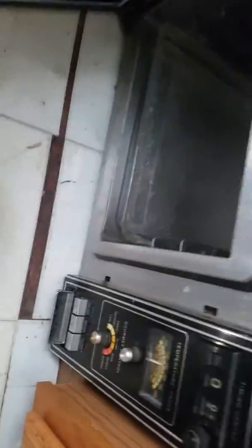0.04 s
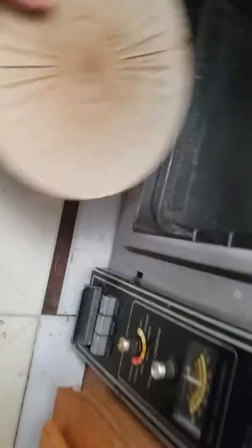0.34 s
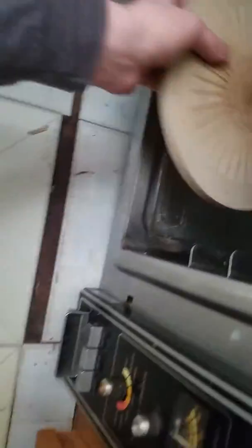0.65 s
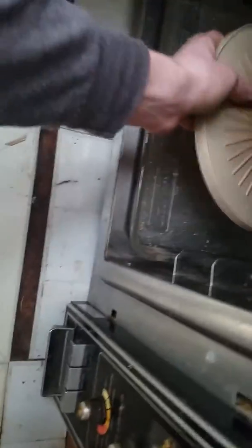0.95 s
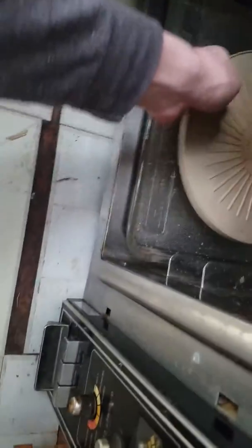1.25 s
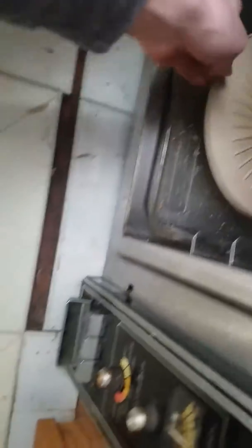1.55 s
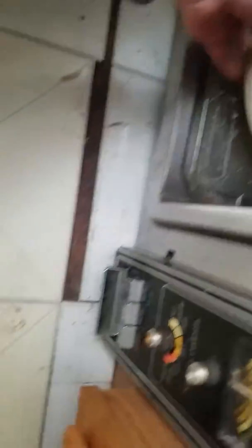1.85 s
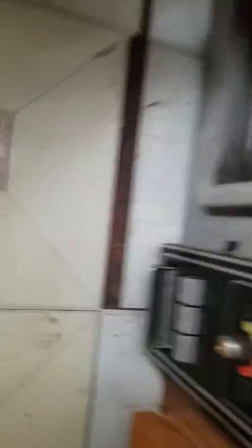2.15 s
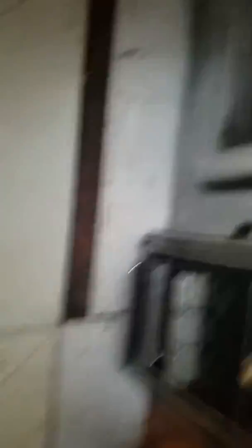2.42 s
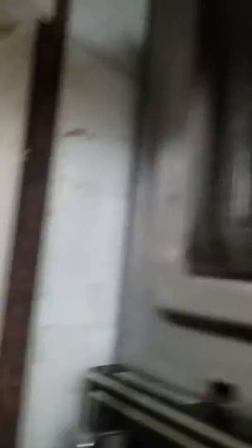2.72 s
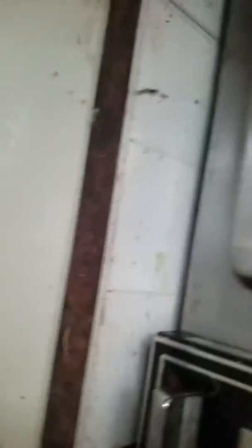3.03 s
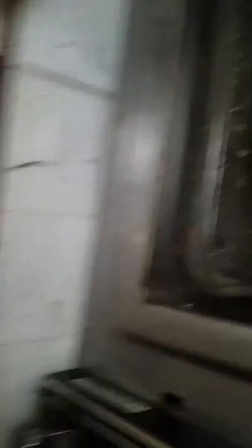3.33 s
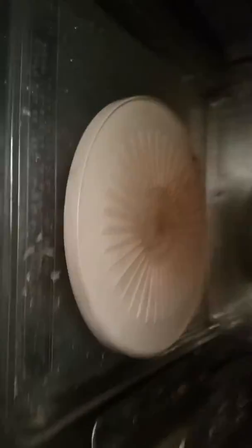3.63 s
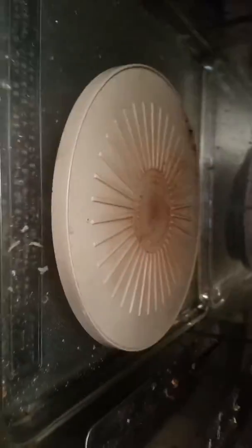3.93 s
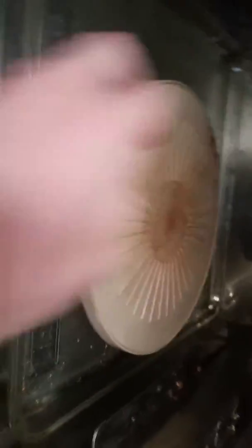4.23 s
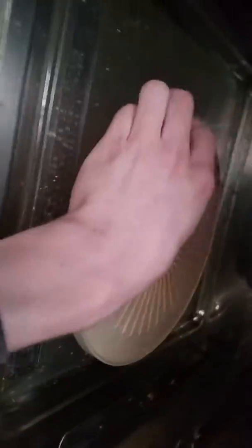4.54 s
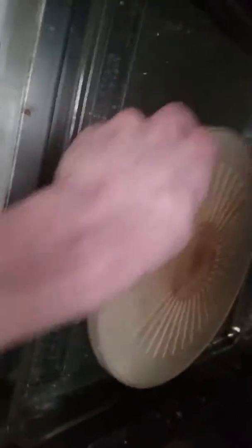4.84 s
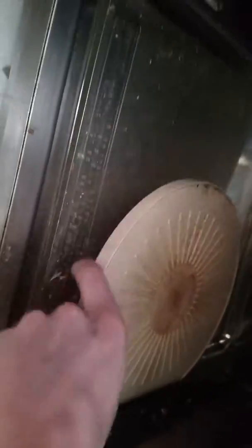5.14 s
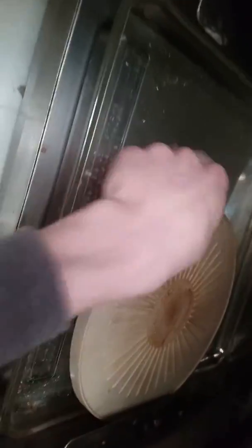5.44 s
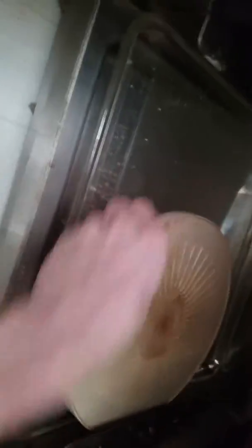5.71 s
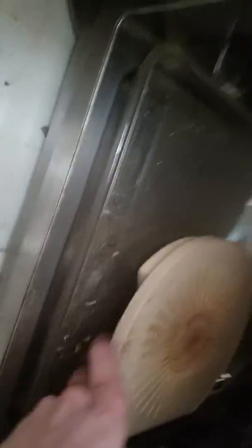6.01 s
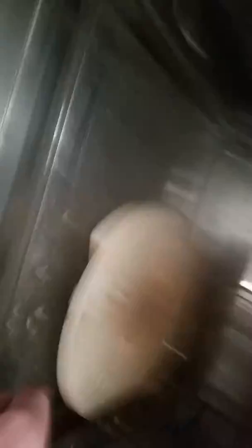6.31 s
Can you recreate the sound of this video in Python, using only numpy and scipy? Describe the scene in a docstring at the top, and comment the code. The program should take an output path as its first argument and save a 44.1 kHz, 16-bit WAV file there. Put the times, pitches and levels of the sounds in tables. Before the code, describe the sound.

A faint appliance hum and quiet kitchen air run throughout, heard through a close hand-held stereo microphone. A step thuds at 0.2 seconds. At about 0.8 seconds a ceramic plate knocks against a steel microwave oven, then clatters, rocks and scrapes until 1.5 seconds, each contact ringing in the metal box. Light ticks follow, with another scrape and clink near 2.3 seconds. Low footsteps thud around 2.6 seconds, the heaviest, and again near 3.7, amid soft sleeve rustle and handling rumble. From 4.4 seconds fingers pat the plastic cover and the plate slides in short pushes. It drops and rocks at 5 seconds, and the oven floor booms hollowly. A louder scrape builds from 5.5 seconds, with a brief squeak at 5.7 and a sharp rattling clack at 5.8, leaving a low boom fading away.

```python
"""In a kitchen, a ceramic plate under a plastic cover is set into an old steel microwave oven.
The plate knocks, drops and rocks to rest, then scrapes and squeaks as it is nudged into place.
Each contact rings the plate and rattles round the steel box; the oven floor booms when the hand
lets go. Steps thud, a sleeve rustles near the hand-held stereo microphone, and an appliance hums."""
import sys
import numpy as np
from scipy import signal
from scipy.fft import rfft, irfft, next_fast_len
from scipy.io import wavfile
from scipy.ndimage import uniform_filter1d

SR = 44100
rng = np.random.default_rng(int(sys.argv[2]) if len(sys.argv) > 2 else 0)


def unload_audio(sound):
    """Save the sound as a 16-bit wav file, at the path given as the first command line argument."""
    columns = np.transpose(np.atleast_2d(sound))
    # keep every value between -1 and 1, then stretch to whole-number steps
    steps = np.round(np.clip(columns, -1, 1) * 32767)
    wavfile.write(sys.argv[1], SR, steps.astype(np.int16))


N = 285327
T = np.arange(N) / SR
RING_T = T[:SR * 9 // 20]  # the life of one blow

# the notes that plate and oven ring with: pitch_hz, level_db, fade_s (a fade is the time to fall 60 dB)
RING_NOTES = [(100, -2, .35), (153, -6, .3), (360, -5, .33), (497, -5, .33), (555, -6, .3), (598, -2, .35),
              (630, -4, .38), (705, -6, .25), (802, -6, .42), (845, -7, .38), (932, -4, .36),
              (980, -6, .33), (1134, -7, .18), (1203, -5, .2), (1278, -2, .25), (1335, -6, .24),
              (1470, -5, .22), (1503, -3, .28), (1605, -5, .2), (1680, -4, .26), (1906, -8, .25),
              (2366, -4, .21), (2500, -7, .2), (2620, -8, .18), (2668, -5, .24), (2732, -6, .24),
              (2880, -9, .2), (3595, -13, .3), (4815, -16, .24)]
# borders of six bands, from low thump to high treble: edge_hz
BAND_EDGES = [55, 220, 800, 1800, 3400, 7000, 16000]
# how alike left and right sound: pitch_hz, likeness (1 = the same)
LIKENESS = [(60, 0.99), (170, .99), (300, 0.94), (650, 0.41), (1300, 0.18), (3000, 0.066), (16000, .05)]


def amp(db):
    """Turns decibels into a gain."""
    return 10 ** (np.asarray(db) / 20)


def unit(x):
    """Scales a sound to an average (rms) strength of 1."""
    return x / np.sqrt(np.mean(x ** 2) + 1e-20)


def attack_strength(x):
    """Strength of the first 25 ms of a blow."""
    return np.sqrt(np.mean(x[:, :SR // 40] ** 2) + 1e-20)


def look_up(table, hz):
    """Reads a table between its rows, on a scale of octaves."""
    pitches, values = np.transpose(table)
    return np.interp(np.log(hz + 1), np.log(pitches + 1), values)


def gain_over_time(curve):
    """Turns rows of time and decibels into a gain for every sample."""
    return amp(np.interp(T, *np.transpose(curve)))


def add(mix, start_s, sound):
    """Mixes a sound in at its start time."""
    part = mix[:, round(start_s * SR):][:, :sound.shape[-1]]
    part += sound[..., :part.shape[1]]


def stereo(spectra, hz, right_delay_s=0.00021):
    """Blends two unrelated spectra into left and right; the left microphone is nearer."""
    alike = np.clip(look_up(LIKENESS, hz), -1, 1)
    mid = np.sqrt((1 + alike) / 2) * spectra[0]
    side = np.sqrt((1 - alike) / 2) * spectra[1]
    return np.array([mid + side, (mid - side) * np.exp(-2j * np.pi * hz * right_delay_s)])


def coloured(white, colour):
    """Gives two rows of white noise a tone colour and a stereo width, at strength 1."""
    size = next_fast_len(white.shape[1], True)
    hz = np.fft.rfftfreq(size, 1 / SR)
    spectra = stereo(rfft(white, size), hz) * amp(look_up(colour, hz))
    return unit(irfft(spectra, size)[:, :white.shape[1]])


def noise(colour, samples=N):
    """Steady stereo noise of the given colour."""
    return coloured(rng.standard_normal((2, samples)), colour)


def background(air_db=-53.5, waver_radians=.5):
    """Still kitchen air, the hum of an appliance, and the rumble of the hand on the microphone."""
    # colours of the air and of the hand's rumble: pitch_hz, level_db
    air_colour = [(20, -17), (45, -7.5), (120, -12), (300, -4.5), (470, -3.5), (650, -10), (1100, -14.5),
                  (2200, -20), (4000, -31), (7000, -39), (16000, -34.5)]
    grip_colour = [(20, -15), (40, -14.5), (62, 5.5), (110, -2), (160, 6), (260, -8.5), (500, -19),
                   (1200, -28), (4000, -52.5)]
    # how strongly the hand rumbles: time_s, level_db
    handling = [(0, -76), (.7, -59), (1.9, -57.5), (2.25, -34.5), (2.6, -36.5), (3.1, -44), (3.5, -45.5),
                (3.95, -43.5), (4.2, -46.5), (5.5, -39), (6.5, -48)]
    # the appliance's tones: pitch_hz, level_db
    hum_tones = [(118.4, -70), (236, -69), (355.3, -65), (473.7, -61), (3472, -84.5)]
    # the oven's walls screen off the kitchen as the microphone leans in: time_s, gain_db
    shelter = [(0, 3.5), (3.4, 4.5), (4.3, 1.5), (6.4, -8)]
    air = amp(air_db) * noise(air_colour)
    grip = gain_over_time(handling) * noise(grip_colour)
    hum, waver_times = np.zeros(N), np.linspace(0, T[-1], 50)
    for hz, db in hum_tones:
        waver = waver_radians * np.interp(T, waver_times, rng.standard_normal(len(waver_times)))
        hum += amp(db) * np.sqrt(2) * np.sin(2 * np.pi * hz * T + waver)
    return gain_over_time(shelter) * (air + hum) + grip


def sleeve(cloth_db=2, flutter_db=1.4):
    """Fibres brush past one another as the arm swings by the microphone."""
    # arm swings: fastest_s, half_length_s, level_db
    swings = [(2.126, 0.09, -55.5), (2.822, 0.38, -58.5), (3.445, .2, -55), (4.003, 0.12, -54.5)]
    # colour of the rustle: pitch_hz, level_db
    cloth_colour = [(30, -19), (170, 29.5), (300, -3), (700, 4), (2000, 14), (4000, 18), (7000, 11),
                    (10000, 12.5), (13500, 15.5), (16000, 14)]
    flutter = unit(uniform_filter1d(rng.standard_normal(N), size=700))
    power = sum(amp(db) ** 2 * np.exp(-((T - s) / half) ** 2) for s, half, db in swings)
    return amp(cloth_db + flutter_db * flutter) * np.sqrt(power) * noise(cloth_colour)


def steps(rise_s=0.0036, rumble_fade_s=0.28):
    """A heel bounces the kitchen floor at its own low note, and the cabinets rumble after it."""
    # footfalls: start_s, level_db, pitch_hz, fade_s, rumble_db (compared with the thud)
    footfalls = [(0.2264, -10.5, 99, 0.061, -16.5), (2.56, -1.5, 81.3, 0.14, -13),
                 (2.592, -6.5, 79.2, 0.22, -15), (2.808, -18, 84.6, 0.6, -3), (2.916, -37.5, 82, 0.14, 7),
                 (3.645, -21, 62, 0.15, -27), (3.762, -16, 88, 0.16, -38), (3.848, -30.5, 111, 0.13, -20)]
    # colour of the cabinets' rumble: pitch_hz, level_db
    cabinet_colour = [(25, -5), (45, -2.5), (75, -7.5), (150, -2.5), (280, -10.5), (500, -28),
                      (2000, -36.5), (6000, -56.5), (16000, -74)]
    out = np.zeros((2, N))
    rise = 1 - np.exp(-(RING_T / rise_s) ** 2)
    for start_s, db, hz, fade_s, rumble_db in footfalls:
        thud = -np.sin(2 * np.pi * hz * RING_T) * amp(-60 * RING_T / fade_s)
        rumble = amp(rumble_db - 60 * RING_T / rumble_fade_s) * noise(cabinet_colour, len(RING_T))
        add(out, start_s, amp(db) * rise * (thud + rumble))
    return out


def push(start_s, stop_s, db, rise_s=0.035, swell_db=18.5, fall_db_per_s=323):
    """Loudness of one push: rubbing grows as the hand leans in and dies when it stops."""
    rise = np.clip((T - start_s) / rise_s, 0, 1)
    to_go = np.clip((stop_s - T) / (stop_s - start_s), 0, 1)
    stopped_s = np.clip(T - stop_s, 0, 1)
    return rise * amp(db - swell_db * to_go - fall_db_per_s * stopped_s)


def sliding(slips_per_s=200, spread_db=0.0, slip_fade_s=0.11, tail_gain=0.22, ring_gain=0.26):
    """The plate's unglazed foot sticks and slips; each slip is a short burst that stirs its notes."""
    # pushes across the oven floor: start_s, stop_s, level_db (at the stop)
    pushes = [(1.02, 1.19, -23.5), (1.322, 1.398, -33), (1.45, 1.59, -47), (1.636, 1.89, -49.5),
              (2.095, 2.363, -37), (3.542, 3.588, -44), (4.38, 4.637, -47), (4.622, 4.798, -34.5),
              (4.804, 4.96, -29), (5.065, 5.274, -51.5), (5.38, 5.484, -46.5), (5.495, 5.887, -22.5)]
    # colour of the scrape: pitch_hz, level_db
    scrape_colour = [(30, -25.5), (70, -9.5), (170, 6.5), (300, 5), (700, -0.5), (1500, -4.5), (2800, -6.5),
                     (4500, -15.5), (7000, -22.5), (11000, -20), (16000, -25)]
    slipping = rng.random(N) < slips_per_s / SR
    slips = slipping * amp(spread_db * np.minimum(rng.exponential(1, N), 4))
    fading = amp(-120 * RING_T / slip_fade_s) + tail_gain * amp(-60 * RING_T / slip_fade_s)
    power = abs(signal.oaconvolve(slips ** 2, fading)[:N])
    scrape = coloured(np.sqrt(power) * rng.standard_normal((2, N)), scrape_colour)
    ring = sum(signal.lfilter(*signal.iirpeak(hz, hz * fade_s / np.pi, SR), scrape)
               for hz, _, fade_s in RING_NOTES)
    return sum(push(*row) for row in pushes) * unit(scrape + ring_gain * ring)


def squeak(peak_s=5.702, half_length_s=0.031, pitch_hz=2900, db=-34.5, jitter_hz=90, octave_db=-9):
    """Before the plate's foot breaks loose, its slips lock into an unsteady tone and its octave."""
    hz = pitch_hz + jitter_hz * unit(uniform_filter1d(rng.standard_normal((2, N)), size=90))
    phase = 2 * np.pi * np.cumsum(hz, axis=1) / SR
    swell = amp(db) * np.exp(-((T - peak_s) / half_length_s) ** 2)
    return swell * (np.sin(phase) + amp(octave_db) * np.sin(2 * phase))


def floor_boom(rise_s=0.0024, damping_s=.03, main_note_hz=194.5):
    """The oven's loaded steel floor booms on until the hand presses the plate again."""
    # booms: start_s, level_db, damped_at_s, hardness_db (extra per octave from a harder blow)
    booms = [(4.906, -19, 4.94, -2.5), (5.003, -17.5, 5.73, -1.5), (5.744, -21, 6.9, -1),
             (5.835, -25, 7, 4.2)]
    # the steel floor's own notes: pitch_hz, level_db, fade_s
    floor_notes = [(66, -13, 1.0), (88, -12, .7), (100, -4, .5), (153, -15, 1.0), (177, -10, 1.0),
                   (194.5, 0, 1.7), (269, -21, .8), (409, -23, .6), (490, -22, .7), (549, -19, 1.15),
                   (574, -22, 1.0), (748, -22, 1.45), (786, -18, 1.25), (937, -31, 1.1), (1034, -31, 1.0)]
    out = np.zeros((2, N))
    for start_s, boom_db, damped_at_s, hardness_db in booms:
        t = T[:N - round(start_s * SR)]
        rise = 1 - np.exp(-t / rise_s)
        damping = np.exp(-np.maximum(start_s + t - damped_at_s, 0) / damping_s)
        for hz, db, fade_s in floor_notes:
            stereo_phase = np.arccos(np.clip(look_up(LIKENESS, hz), -1, 1)) * np.array([[.5], [-.5]])
            tone = np.sin(2 * np.pi * hz * t + stereo_phase)
            strength_db = boom_db + db + hardness_db * np.log2(hz / main_note_hz)
            add(out, start_s, amp(strength_db - 60 * t / fade_s) * rise * damping * tone)
    return out


def floor_flex(pat_db, pitch_hz=166.2, boost_db=17.5, fade_s=.22, rise_s=0.01):
    """The oven floor bends under a pat and gives one short hollow note."""
    rise = 1 - np.exp(-RING_T / rise_s)
    return amp(pat_db + boost_db - 60 * RING_T / fade_s) * rise * np.sin(2 * np.pi * pitch_hz * RING_T)


def oven_rattle(landing_s, kitchen_db=-17, crack=1.6):
    """A sharp crack on landing, fast dense echoes in the steel box, and the slower kitchen behind."""
    # colour of the steel box: pitch_hz, level_db
    box_colour = [(40, -23), (95, -10), (170, 5), (240, -4), (400, 1.5), (650, 4.5), (1050, 1), (1500, 4.5),
                  (2100, 3.5), (2700, 1), (4600, -8), (6200, -17), (10000, -18.5), (16000, -21.5)]
    # how long echoes last in the box and in the kitchen: pitch_hz, fade_s
    box_fades = [(100, 0.22), (400, 0.25), (1000, 0.13), (3000, .12), (7000, 0.15), (14000, 0.16)]
    kitchen_fades = [(100, 0.51), (300, 1), (700, 1), (1500, 0.29), (3000, 0.64), (7000, 0.55),
                     (14000, 0.2)]
    white = rng.standard_normal((2, len(RING_T)))
    white[0, int(landing_s * SR)] += crack
    hz, t, spectra = signal.stft(coloured(white, box_colour), SR, nperseg=256)
    box = amp(-60 * t / look_up(box_fades, hz)[:, None])
    kitchen = amp(kitchen_db - 60 * t / look_up(kitchen_fades, hz)[:, None])
    rattle = signal.istft(spectra * np.hypot(box, kitchen), SR)[1][:, :len(RING_T)]
    return rattle / attack_strength(rattle)


def plate_body():
    """What all contacts share: the free ring of each note, and filters that split the bands."""
    hz, db, fade_s = np.transpose(RING_NOTES)
    rings = amp(db)[:, None] * np.exp((2j * np.pi * hz - np.log(1000) / fade_s)[:, None] * RING_T)
    bands = [signal.butter(3, edges, "band", fs=SR, output="sos")
             for edges in zip(BAND_EDGES, BAND_EDGES[1:])]
    return hz, rings, bands


def contact(body, db, pitch_hz, hardness_db, thump_db, fade_s, landing_s, pitch_boost_db,
            graze_db=-12, ring_db=-2, scatter_db=3.5, resonance=0.69, boost_width_octaves=0.69):
    """Each contact rings a new mix of notes; hard ones are brighter, and weight thumps the floor."""
    # the five bands above the thump, for a contact of middling hardness: level_db
    touch_db = [0, -3.5, -7, -11, -13]
    hz, rings, bands = body
    phases = stereo(np.exp(2j * np.pi * rng.random((2, len(hz)))), hz)
    shares = phases * amp(scatter_db * rng.standard_normal(len(hz)))
    ring = (shares @ rings).real
    graze = amp(graze_db * np.maximum(1 - RING_T / (landing_s + 1e-5), 0))  # light until it lands
    blow = graze * (oven_rattle(landing_s) + amp(ring_db) * ring / attack_strength(ring))
    # the spot that is struck favours the notes round one pitch
    blow += resonance * signal.lfilter(*signal.iirpeak(pitch_hz, Q=6, fs=SR), blow)
    blow *= amp(-60 * RING_T / fade_s)  # a plate that stays pressed down dies sooner
    centres_hz = np.sqrt(np.multiply(BAND_EDGES[1:-1], BAND_EDGES[2:]))
    favoured_db = pitch_boost_db * np.exp(-(np.log2(centres_hz / pitch_hz) / boost_width_octaves) ** 2)
    tilt_db = hardness_db * np.log2(centres_hz / centres_hz[1])
    bands_db = [thump_db, *(touch_db + tilt_db + favoured_db)]
    out = np.zeros_like(blow)
    for k, (band, band_db) in enumerate(zip(bands, bands_db)):
        part = signal.sosfilt(band, blow)
        sign = (-1) ** k  # keeps neighbouring bands from cancelling
        out += sign * amp(db + band_db) / attack_strength(part) * part
    return out


def plate(pat_hz=620, pat_spread_octaves=.6):
    """The plate drops, rocks, knocks and is patted into place; the kitchen floor creaks once."""
    # single knocks and ticks, mostly the rim on steel, plus a floor creak under a footstep:
    # start_s, level_db, pitch_hz, hardness_db (per octave), thump_db (added to the level), fade_s
    knocks = [(0.5189, -38, 2800, -2, -29, 0.4), (.761, -21, 1850, 0.47, -16, 8.9),
              (0.929, -36, 590, -1, -9.5, 1.3), (1.068, -35, 1400, 4.5, -32, 2),
              (1.079, -26, 1740, 1.3, -13, 2.5), (1.087, -29, 650, 1, -14, 1.5),
              (1.129, -32, 1500, 0.5, -35, 2), (1.147, -21.5, 760, -0.8, -19, 2.5),
              (1.197, -30.5, 2460, 0, -4, 1.9), (1.333, -32, 1500, 1, -12, 2),
              (1.341, -24, 657, -0.4, -17, 4), (1.41, -39, 880, -5.5, -3, 8),
              (1.623, -47.5, 655, -3.5, -3, 3.4), (1.652, -52, 3500, 1, 1, 0.59),
              (1.713, -54, 593, -4.5, 3, 5), (2.136, -50.5, 710, -2, -11, 2.2),
              (2.272, -39.5, 594, 1.5, 9, 2), (2.29, -34, 845, -4, 3, 0.88),
              (2.283, -26, 2300, -1.8, -4.5, 1.5), (2.349, -41.5, 700, -3.5, -8, 1.5),
              (2.563, -50.5, 1500, -3.5, 23, 3), (2.7911, -38, 1820, 3, 5, 0.65),
              (3.05, -63.5, 1800, 4, 9, 1), (3.586, -56, 3650, 2, 9, 2), (3.939, -52, 613, -0.5, 9.5, 3),
              (4.293, -42.5, 465, 0.4, 15.5, 0.75), (4.801, -44, 1460, -1.7, -15, .4),
              (4.891, -31.5, 520, 0.6, 9, .25), (4.9874, -32.5, 1400, -1.5, -10, 1),
              (5.0, -28, 2360, -1.5, 2, 2.9), (5.126, -31, 2400, -3, 4, 0.53),
              (5.611, -37.5, 1300, 0, 5, 1), (5.719, -48, 1600, 7.3, 13.5, 1),
              (5.7365, -26, 548, -0.2, 0, .22)]
    # the plate is let down: start_s, landing_s (from first graze to landing), rocking_s,
    # level_db, pitch_hz, hardness_db, thump_db, fade_s
    drops = [(.952, 0.0099, 0.04, -24, 1210, 2, -17, 5.8),
             (1.175, 0.0022, .084, -24.5, 720, -0.1, -23, 1.2),
             (1.363, 0.003, .088, -25.5, 2030, 0.67, -14, 2.8),
             (4.984, 0.0084, .078, -25, 526, 1.23, 9, 2.4),
             (5.818, 0.0021, .078, -19.5, 2700, 1.16, 2.5, 1.07)]
    # every drop rocks alike, each contact weaker and duller:
    # share_of_rocking_time, level_change_db, hardness_change_db, pitch_boost_db
    rocking = [(0, 2.5, 0.5, 8.5), (.21, -2.5, -1.05, -1.5), (.54, -6, -1.4, -0.5), (0.998, -12, -3.5, 2)]
    # fingers pat the plastic cover: start_s, level_db, hardness_db
    pats = [(4.38, -44.5, 0), (4.399, -41, 1), (4.4467, -38, -0.5), (4.509, -47, 1), (4.547, -40.5, -2.5),
            (4.558, -38, 1.5), (4.702, -50, 0.5), (4.777, -40.5, -1.5), (4.911, -41.5, 0.5),
            (4.934, -37, -3), (5.496, -38, 0.5), (5.539, -40.5, -2), (5.555, -41.5, -0.5), (5.587, -47, -2),
            (5.759, -36, 0.7)]
    out, body = np.zeros((2, N)), plate_body()
    for start_s, landing_s, rocking_s, db, pitch_hz, hardness_db, thump_db, fade_s in drops:
        for share, weaker_db, softer_db, pitch_boost_db in rocking:
            clack = contact(body, db + weaker_db, pitch_hz, hardness_db + softer_db, thump_db,
                            fade_s, landing_s, pitch_boost_db)
            add(out, start_s + share * rocking_s, clack)
    for start_s, *knock in knocks:
        add(out, start_s, contact(body, *knock, landing_s=.0014, pitch_boost_db=11.5))
    for start_s, db, hardness_db in pats:
        spot_hz = pat_hz * 2 ** (pat_spread_octaves * rng.uniform(-1.2, 2))  # a new spot each time
        pat = contact(body, db, spot_hz, hardness_db, thump_db=8.5,
                      fade_s=2.4, landing_s=.003, pitch_boost_db=1.5)  # light fingers hardly damp it
        add(out, start_s, pat + floor_flex(db))
    return out


def scene():
    """Everything that sounds in the kitchen."""
    return plate() + floor_boom() + steps() + sliding() + squeak() + sleeve() + background()


def record(dry, top_hz=15950):
    """Each microphone adds its own slight colour; peaks clip, and the highest treble is cut."""
    # balance of the two microphones: pitch_hz, left_minus_right_db
    balance = [(60, -1.5), (300, -1), (700, .4), (2700, -2), (5500, .5), (9000, 2.4)]
    hz = np.fft.rfftfreq(N, 1 / SR)
    heard = irfft(rfft(dry) * amp(look_up(balance, hz) * np.array([[.5], [-.5]])), N)
    treble_cut = signal.firwin(301, top_hz, window=("kaiser", 8), fs=SR)
    return signal.oaconvolve(np.clip(heard, -1, 1), treble_cut[None], "same")


dry = scene()
out = record(dry)
unload_audio(out)
```